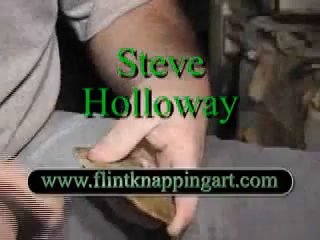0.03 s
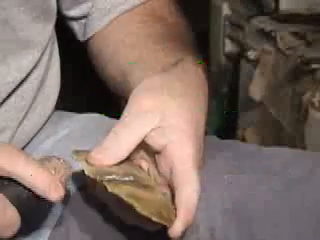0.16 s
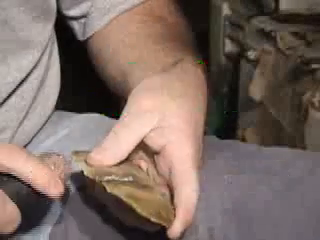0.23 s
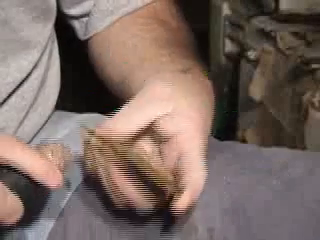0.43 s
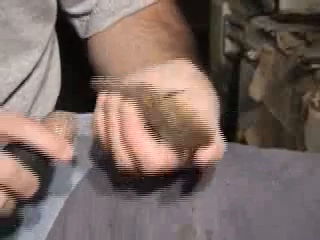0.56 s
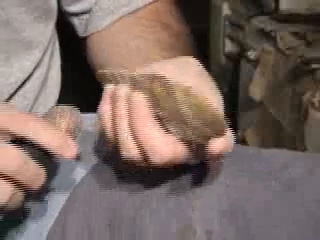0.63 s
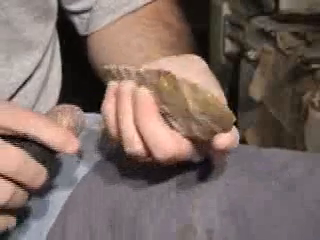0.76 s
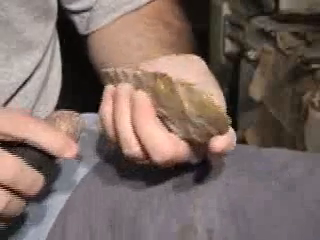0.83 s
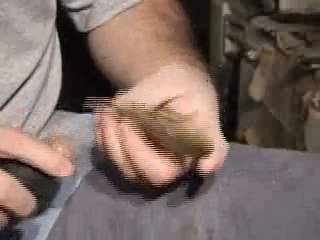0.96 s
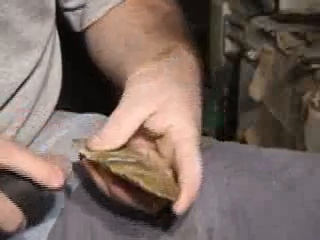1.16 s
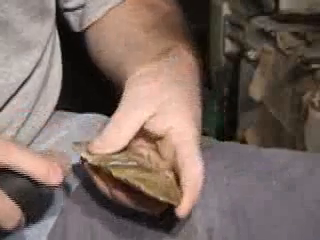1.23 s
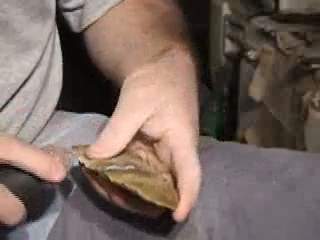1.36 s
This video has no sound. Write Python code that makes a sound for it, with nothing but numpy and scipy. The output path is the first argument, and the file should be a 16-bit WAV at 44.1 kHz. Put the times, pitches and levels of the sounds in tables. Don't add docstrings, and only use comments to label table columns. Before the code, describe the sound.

A sharp crack of stone being struck, then brittle flakes clatter and ring like glass, close up

```python
import sys
import numpy as np
from scipy import signal
from scipy.fft import rfft, irfft
from scipy.io import wavfile
from scipy.ndimage import uniform_filter1d

SR = 44100
rng = np.random.default_rng(int(sys.argv[2]) if len(sys.argv) > 2 else 0)


def unload_wav(signal):
    wavfile.write(
        sys.argv[1],
        SR,
        np.round(np.clip(np.atleast_2d(signal).T, -1, 1) * 32767).astype(np.int16),
    )


def attenuation_scalar(level_db):
    decades = np.asarray(level_db, float) / 20
    return 10 ** decades


N = 61739


def evened(x):
    return x / np.sqrt(np.mean(x ** 2) + 1e-20)


def read(points, hz):
    f, value = np.transpose(points)
    return np.interp(np.log(hz + 1), np.log(f + 1), value)


def add(mix, s, sound):
    part = mix[max(round(s * SR), 0):][:len(sound)]
    part += sound[:len(part)]


def coloured(x, gain):
    return irfft(rfft(x) * gain(np.fft.rfftfreq(x.shape[-1], 1 / SR)), x.shape[-1])


def hum():
    # f/Hz, coherence [0-1]
    likeness = [(60, 0.9), (1260, 0.81), (6000, 0.42)]
    # f/Hz, level/dB per Hz
    air_tone = [(25, -25.5), (60, -7.5), (500, -6.5), (1300, -12.5), (1900, -26), (6000, -20.5),
                (7200, -30), (11800, -34.5)]
    # f/Hz, width/Hz, level/dB
    whir = [(110, 15, -65), (794, 150, -61), (2448, 200, -62)]

    def same(f):
        return np.clip(read(likeness, f), 0, 1)

    a, b = rng.standard_normal((2, N))
    other = coloured(a, same) + coloured(b, lambda f: np.sqrt(1 - same(f) ** 2))
    pair = np.array([a, other])
    out = attenuation_scalar(-46.5) * evened(coloured(pair, lambda f: attenuation_scalar(read(air_tone, f))))
    for hz, width, db in whir:
        out = out + attenuation_scalar(db) * evened(coloured(pair, lambda f: np.exp(-((f - hz) / width) ** 2)))
    left_db = 1
    return out * attenuation_scalar(np.array([[left_db / 2], [-left_db / 2]]))


def room(x):
    t60, taps_share = .12, .05
    t = np.arange(SR // 4) / SR
    signs = rng.choice([-1., 1.], len(t))
    sparse = rng.random(len(t)) < taps_share
    taps = signs * sparse * attenuation_scalar(-60 * t / t60) * (t > .003)
    return signal.fftconvolve(x, taps / np.linalg.norm(taps))[:N]


def grit():
    # t/s, level/dB, t60/s
    landings = [
        (0, -39.5, 0.73),
        (0.243, -15.5, .5),
        (.356, -20.5, .4),
        (.417, -24, .4),
        (0.494, -32.5, .25),
        (0.7438, -27, .2),
    ]
    # f/Hz, level/dB
    grit_tone = [(500, -41.5), (1500, -18), (3500, -10.5), (6500, -3.5), (9000, -4), (11500, -9.5)]
    grains_per_s, spread_db, hiss = 2500, 3.5, .8
    t = np.arange(N) / SR
    sizes = attenuation_scalar(spread_db * np.minimum(rng.exponential(1, N), 4))
    hits = rng.random(N) < grains_per_s / SR
    grains = sizes * hits * rng.choice([-1., 1.], N)
    mixed = evened(grains) + hiss * rng.standard_normal(N)
    rattle = evened(coloured(mixed, lambda f: attenuation_scalar(read(grit_tone, f))))
    power = sum((t >= s) * attenuation_scalar(db - 60 * np.maximum(t - s, 0) / t60) ** 2 for s, db, t60 in landings)
    return rattle * np.sqrt(power)


def ring(start, stop, hz, db, t60):
    rise_s, damp_s, spin_hz, ring_db = .0005, .002, 70, 1.2
    waver_db, steady_db = 1.6, -13
    t = np.arange(0, max(stop - start, 0) + .03, 1 / SR)
    spin = rng.random(4)
    waver = sum(np.sin(2 * np.pi * (spin_hz * (.4 + spin[k]) * t + spin[k + 2])) for k in (0, 1))
    depth_db = waver_db * np.clip((steady_db - db) / 20, .1, 1)
    choke = np.exp(-np.maximum(t - (stop - start), 0) / damp_s)
    rise = np.minimum(t / rise_s, 1)
    level = attenuation_scalar(ring_db + db - 60 * t / t60 + depth_db * waver) * choke * rise
    return start, np.sqrt(2) * level * np.sin(2 * np.pi * hz * t)


def tick(start, db, hz, ms):
    octaves, rise_share = 0.62, 0.1977
    skirt_db, soft_db_per_ms = -9, -3.5
    tone, tone_ms = 1.8, 1.5

    def bell(f):
        peak = np.exp(-(np.log2((f + 1) / hz) / octaves) ** 2)
        skirt = attenuation_scalar(skirt_db + soft_db_per_ms * ms) * f ** 2 / (f ** 2 + 1500 ** 2)
        return peak + skirt

    noise = rng.standard_normal(1024)
    t = np.arange(len(noise)) * 1000 / SR
    shape = np.minimum(t / (rise_share * ms), 1) * np.exp(-t / ms)
    pitch = tone * np.exp(-ms / tone_ms) * np.sin(2 * np.pi * hz * t / 1000)
    return start, attenuation_scalar(db) * (evened(coloured(noise, bell)) + pitch) * shape * np.sqrt(2)


def small_flakes():
    # t/s, damped at t/s, f/Hz, level/dB, t60/s
    small_rings = [(.4205, .45, 7955, -24, .25), (.464, .474, 7962, -32, .2), (.477, .497, 7962, -28, .16),
                   (.52, .532, 7965, -38, .12), (.4525, .478, 8990, -18, .07), (.501, .525, 9010, -24, .08),
                   (.492, .527, 5903, -18, .17), (.53, .549, 5906, -29, .13), (.57, .582, 5906, -33, .15),
                   (.589, .632, 5910, -39.5, .4), (.42, .44, 8640, -34, .1), (.7432, .755, 7690, -8, .032),
                   (.7555, .759, 7680, -22, .05), (.7591, .771, 7690, -16, .08),
                   (.773, .783, 7690, -29, .08), (.7935, .805, 7680, -32, .06),
                   (.818, .825, 7680, -42, .08), (.826, .96, 7690, -56, .5), (.745, .754, 11250, -35, .9),
                   (.7552, .762, 11250, -23, .06), (.765, .784, 11250, -36, .9),
                   (.793, .89, 11270, -54, .4)]
    ahead = np.zeros(N)
    for row in small_rings:
        add(ahead, *ring(*row))
    return ahead


def struck_stone():
    # t/s, damped at t/s, f/Hz, level/dB, t60/s
    old_rings = [
        (0, .135, 5022, -38, .55),
        (.137, .19, 5022, -55, .4),
        (0, .12, 8757, -47, .45),
        (0, .068, 9387, -43, .4),
        (.0705, .086, 9610, -36, .07),
        (.21, .222, 9750, -50, .08),
        (.048, .08, 11200, -54, .2),
    ]
    # t/s, damped at t/s, f/Hz, level/dB, t60/s
    big_rings = [(.2425, .2495, 8300, -18, .06), (.2512, .254, 9000, -13, .05),
                 (.2695, .352, 8446, -12.5, 1.1), (.356, .372, 8440, -27, .2), (.372, .383, 8450, -16, .15),
                 (.269, .3, 5556, -25, .6), (.3445, .355, 5573, -14.5, .2), (.395, .424, 5590, -30, .5),
                 (.278, .304, 6724, -25, .25), (.314, .336, 6727, -23, .2), (.27, .284, 9390, -24, .2),
                 (.356, .381, 9430, -22.5, .9), (.357, .378, 9020, -23, .2), (.351, .369, 7260, -29, .15),
                 (.272, .35, 8960, -33, 1.0), (.403, .41, 6900, -27, .05)]
    # t/s, damped at t/s, f/Hz, level/dB, t60/s
    further_rings = [(.07, .13, 9387, -56, .4), (.145, .157, 9780, -55, .1), (.142, .175, 8330, -57, .3),
                     (.204, .214, 4800, -54, .2), (.2545, .259, 8450, -15, .08),
                     (.2605, .2695, 8450, -20, 1.0), (.302, .343, 5556, -23, .7),
                     (.3565, .381, 5590, -16, .16), (.383, .394, 5590, -33, .3), (.288, .352, 9383, -31, .9),
                     (.33, .339, 7300, -33, .1), (.39, .396, 7300, -32, .1), (.373, .386, 10400, -35, .5),
                     (.306, .313, 11300, -31, .08), (.336, .346, 11400, -37, .3), (.337, .35, 6724, -33, .3),
                     (.385, .392, 6800, -35, .1), (.451, .462, 7960, -35, .5), (.534, .554, 7965, -41, .3),
                     (.572, .583, 7965, -50, .3), (.48, .498, 8990, -42, .3), (.55, .568, 5906, -45, .9),
                     (.472, .477, 10000, -35, .05), (.784, .792, 7690, -29, .05), (.5138, .53, 600, -32, .06),
                     (.5135, .519, 980, -32.5, .025), (.7842, .7855, 4300, -28, .02),
                     (.42, .43, 11200, -36, .1)]
    # t/s, level/dB, f/Hz, decay/ms
    stone_ticks = [(.001, -38, 3000, 12.0), (.01, -34.5, 1504, 6.0), (.033, -24, 5220, 3.0),
                   (.037, -30, 2230, 5.0), (0.0695, -30.5, 5000, 1.0), (0.103, -27.5, 5355, 4.0),
                   (0.1204, -29.5, 3020, 4.0), (0.137, -38, 5200, 1.2), (.165, -43, 4800, 2.0),
                   (0.2408, -3, 3800, .5), (0.2422, -9, 6000, 1.0), (0.2466, -13, 4500, .8),
                   (0.2508, -12, 4700, .8), (0.252, -27, 6040, 1.5), (0.2563, -15, 5000, 1.2),
                   (0.257, -14.5, 1444, 1.5), (0.261, -15.5, 7520, 2.0), (0.264, -9, 6000, .6),
                   (.25, -33, 277.3, 8.0), (.323, -22.5, 2974, 1.2), (0.3561, -11, 5300, .8),
                   (0.3724, -23, 2900, .8), (0.386, -28.5, 6000, 1.2), (.403, -22, 7200, 1.2),
                   (.4168, -6, 5900, .8), (0.4207, -17, 5700, .9), (.4505, -21, 6200, .5),
                  (0.4658, -23, 6200, .6), (.4775, -25, 6000, 0.6), (0.491, -39.5, 6486, 0.54),
                  (0.5007, -29, 9800, 1.2), (0.51, -32, 6930, .6), (.52, -32, 7000, 0.7),
                  (0.5648, -25, 9500, .4), (.622, -33, 7500, 0.4), (0.661, -39, 7500, .8),
                  (.698, -38, 8500, 0.4), (0.7431, -20, 6000, .8), (0.7575, -32, 4200, .8),
                  (.7591, -22, 8900, .6), (0.7627, -29, 4200, .6), (0.784, -36.5, 9000, .8),
                  (.7932, -30, 6000, .7), (0.0971, -39, 2200, 2.0), (.02, -41, 2200, 9.0),
                  (.2628, -13, 4400, 1.1), (0.2538, -13.5, 6000, .7), (.4168, -20, 2700, 1.1),
                  (0.413, -30, 4700, .8), (.439, -30, 4500, .7), (0.452, -20, 6000, .7),
                  (0.277, -20.5, 5000, .7), (0.59, -41, 3300, 1.0), (.553, -35.5, 6540, .7),
                  (.642, -42.5, 9900, 1.5), (.793, -36, 3000, .7), (.4168, -14, 4400, .7),
                  (.7434, -28, 2400, .7), (.269, -22, 4200, 1.5), (.5045, -30, 7000, .6),
                  (.05, -44, 2500, 12.0), (.078, -45, 2800, 12.0), (.7595, -31, 3500, .6)]
    stone = np.zeros(N)
    for row in [*old_rings, *big_rings, *further_rings]:
        add(stone, *ring(*row))
    for row in stone_ticks:
        add(stone, *tick(*row))
    return stone


def two_ports(stone):
    # f/Hz, level/dB
    wide = [(200, -0.5), (1500, -5), (3000, -10), (5300, -20.5), (8700, -10), (11500, -12)]
    lag_s = 2e-5
    side = coloured(stone, lambda f: 1j * attenuation_scalar(read(wide, f)) * np.exp(2j * np.pi * f * lag_s))
    return np.array([stone + side, stone - side])


def scene():
    air = hum()
    ahead = small_flakes()
    stone = grit() + struck_stone()
    stone = stone + attenuation_scalar(-24) * room(stone + ahead)
    return ahead + two_ports(stone) + air


def preamps(dry):
    # t/s, width/s, left swing, right swing [full scale]
    lurches = [
        (0.242, 0.0033, 0.065, -0.022),
        (.256, .003, 0.013, -0.021),
        (.295, 0.061, -0.031, 0.011),
        (.36, 0.0043, 0.07, -.028),
        (0.42, 0.0057, -0.013, -0.033),
        (.747, 0.0035, -0.011, 0.0029),
    ]
    ceiling = .85
    t = np.arange(N) / SR
    limited = dry / (1 + (dry / ceiling) ** 8) ** (1 / 8)
    return limited + sum(np.outer([a, b], np.exp(-((t - s) / width) ** 2)) for s, width, a, b in lurches)


def fold_treble(pair):
    # start t/s, end t/s, rise/s
    stereo = [
        (-.01, 0.075, 0.0098),
        (0.302, .383, 0.03),
        (0.508, 0.528, 0.0058),
        (0.577, 0.665, 0.026),
    ]
    mono_hz, fall_s = 3930, 0.011
    t = np.arange(N) / SR
    kept = sum(np.clip((t - start) / rise, 0, 1) * np.clip((end - t) / fall_s, 0, 1)
               for start, end, rise in stereo)
    left, right = pair
    side = (left - right) / 2
    treble = coloured(side, lambda f: 1 / (1 + (mono_hz / (f + 1)) ** 16))
    side = side - (1 - kept) * treble
    return (left + right) / 2 + np.array([side, -side])


def band_limit(pair):
    # start t/s, end t/s, share [0-1]
    openings = [
        (-.01, .2, .25),
        (0.228, .272, 1),
        (0.27, .31, .25),
        (.753, .764, .3),
    ]

    def lowpass(hz):
        taps = signal.firwin(255, hz, window=("kaiser", 8), fs=SR)
        return signal.oaconvolve(pair, taps[None], "same")

    t = np.arange(N) / SR
    shut, wide = lowpass(11570), lowpass(12400)
    steps = sum(share * (t > start) * (t < end) for start, end, share in openings)
    return shut + uniform_filter1d(steps, size=100) * (wide - shut)


def roll_off(x):
    return signal.sosfilt(signal.butter(12, 13020, fs=SR, output="sos"), x)


def record(dry):
    pair = fold_treble(preamps(dry))
    return roll_off(band_limit(pair))


dry = scene()
out = record(dry)
unload_wav(out)
```